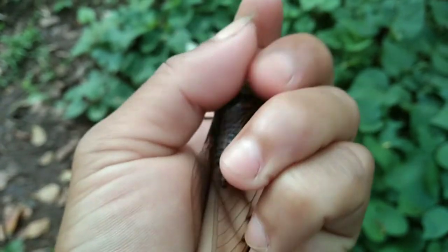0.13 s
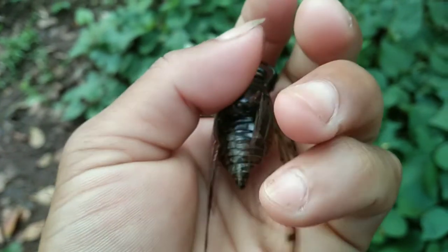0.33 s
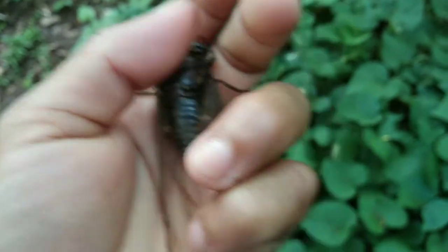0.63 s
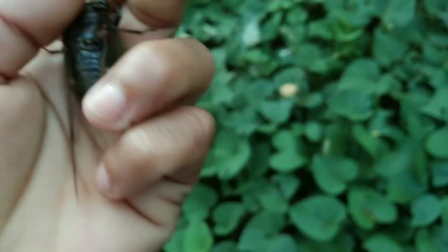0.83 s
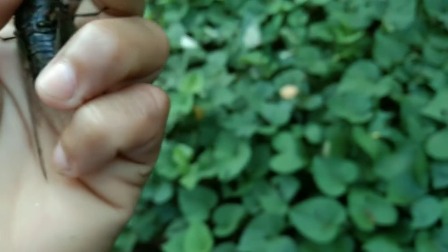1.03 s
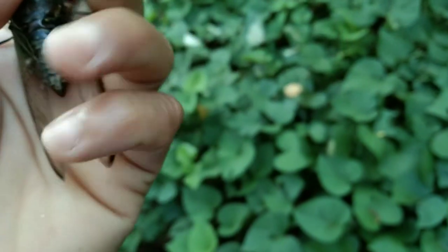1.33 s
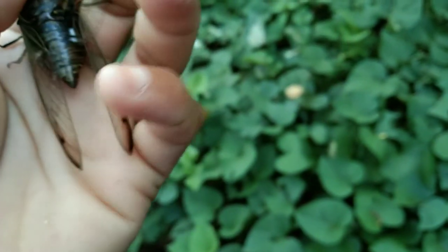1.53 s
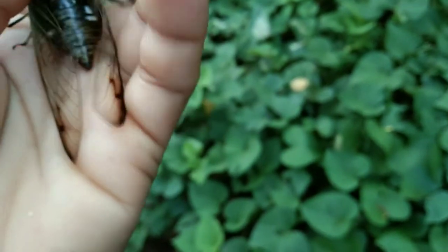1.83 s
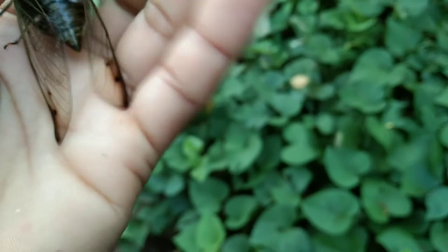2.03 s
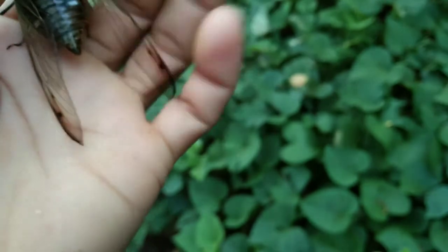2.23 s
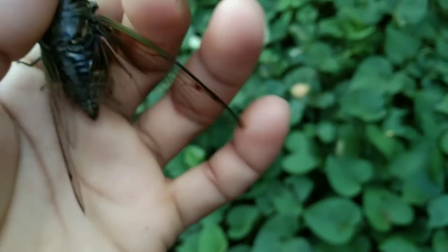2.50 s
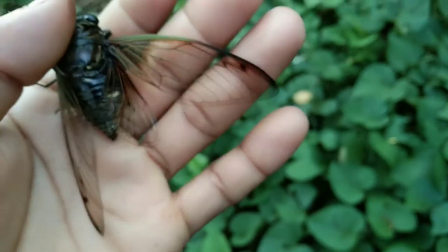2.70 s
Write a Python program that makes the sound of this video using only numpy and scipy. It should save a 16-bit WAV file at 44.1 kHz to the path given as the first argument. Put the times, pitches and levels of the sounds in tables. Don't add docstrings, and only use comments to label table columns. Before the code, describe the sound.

A dense, shrill cicada drone, strongest around 6.5-8 kHz, runs throughout in a wood. Close and dry, a held cicada's wings crack in clusters at 0.1-0.25, 0.52 and 0.65-0.75 seconds with gritty rubbing, sparse single flicks at 1.12 and 1.35, then more from 2.2 to 2.65. Crickets chirp rapidly; faint bird whistles come near 0.3 and 2 seconds, over low hum and soft hand thumps.

```python
import sys
import numpy as np
from scipy import signal
from scipy.io import wavfile
from scipy.ndimage import uniform_filter1d

SR = 44100
rng = np.random.default_rng(int(sys.argv[2]) if len(sys.argv) > 2 else 0)


def digitize_waveform(pressure):
    field = np.atleast_2d(pressure).T
    bounded = np.clip(field, -1, 1)
    quanta = np.round(bounded * 32767).astype(np.int16)
    wavfile.write(sys.argv[1], SR, quanta)


def natural_amplitude(level_db):
    exponent = np.asarray(level_db, float) / 20
    return 10 ** exponent


N = 126126


def level(x, db):
    return x * natural_amplitude(db) / np.sqrt(np.mean(x ** 2))


def noise():
    return rng.standard_normal(N)


def ring(x, hz, width, count=2):
    b, a = signal.iirpeak(min(hz, .45 * SR), hz / width, SR)
    for _ in range(count):
        x = signal.lfilter(b, a, x)
    return x


def curve(rows):
    return np.interp(np.arange(N) / SR, *np.array(rows).T)


def walk(rate):
    hold = int(SR / rate)
    steps = np.repeat(rng.standard_normal(N // hold + 1), hold)
    return 1.186 * uniform_filter1d(uniform_filter1d(steps, hold), hold)[:N]


def gate(s, length, edge):
    t = np.arange(N) / SR - s
    return np.sin(np.pi / 2 * np.clip(np.minimum(t, length - t) / edge, 0, 1)) ** 2


def clicks(rate, scatter, size_db):
    draw = rng.standard_normal((2000, 2))
    gaps = np.exp(scatter * draw[:, 0]) / rate
    at = (np.cumsum(gaps) * SR).astype(int)
    out = np.zeros(N)
    out[at[at < N]] = natural_amplitude(size_db * draw[at < N, 1])
    return np.roll(out, rng.integers(N))


def coloured(shape, lo, hi, patchy_db, rate):
    hz, db = np.array(shape).T
    out = 0
    for f in np.geomspace(lo, hi, num=28):
        band_db = np.interp(np.log(f), np.log(hz), db) + patchy_db * walk(rate)
        out = out + ring(noise(), f, f / 6, count=3) * natural_amplitude(band_db)
    return out


def air_and_rumble():
    # [f/Hz, level/dB per Hz]
    air_shape = [(550, -35), (1500, -25), (2000, -22.5), (2550, -18.5), (3300, -18.5), (4200, -12.5),
                 (5000, -3.5), (5900, -9)]
    # [f/Hz, level/dB per Hz]
    rumble_shape = [(15, -51), (25, -34), (77, -0.5), (123, -7.5), (157, -6.5), (289, -16), (367, -28),
                    (472, -29), (600, -41.5), (780, -67), (1320, -120)]
    air = level(coloured(air_shape, 518.5, 6290, patchy_db=.7, rate=13.07), -48.5)
    rumble = level(coloured(rumble_shape, 28.06, 533.3, patchy_db=4.5, rate=8.7), -60.5)
    return air + rumble


def engine():
    hz = 123.4 * (1 + 0.018 * walk(4.9))
    return natural_amplitude(-62 + 2.5 * walk(12)) * np.sin(2 * np.pi * np.cumsum(hz) / SR)


def hand_thumps():
    # [t/s, level/dB]
    thumps = [
        (.74, -59),
        (1.003, -56),
        (1.26, -63.5),
        (1.798, -61.5),
        (1.97, -58.5),
        (2.418, -87),
        (2.672, -89),
    ]
    knock = level(ring(noise(), 90.3, 70, count=3), 0)
    rise_s = 0.1
    return knock * sum(natural_amplitude(db) * gate(s - rise_s, 2 * rise_s + 0.048, rise_s) for s, db in thumps)


def cicadas():
    # [ring f/Hz, width/Hz, level/dB, rate/Hz (two clicks per cycle, but one at 107),
    # flicker/dB]
    choirs = [
        (6218, 420, -51.5, 260, 0.5),
        (6542, 285, -44, 240, 1.5),
        (6936, 930, -38.5, 175, 1.5),
        (7500, 227, -40.5, 75, 2),
        (7705, 265, -40, 255, 2),
        (7970, 435, -41.5, 97, 0.5),
        (8490, 770, -59, 53, -8.5),
        (9380, 640, -51.5, 190, -0.5),
        (9880, 670, -49, 107, 0.27),
        (10390, 610, -58.5, 200, 0),
    ]
    # [t/s, level/dB]
    swell_points = [(0.0, -35), (0.09, -38), (0.125, -34.5), (0.14, -37), (0.84, -37), (0.98, -35),
                    (1.09, -36.5), (1.17, -35.5), (1.39, -36), (1.43, -35.5), (2.86, -37)]
    steady_rate, top_hz = 107, 10870
    steady = clicks(steady_rate, .03, 0.83)
    out = 0
    for hz, width, db, rate, flicker_db in choirs:
        near = steady if rate == steady_rate else clicks(2 * rate, .25, 4.0)
        near = level(near * np.sign(noise()), 0)
        crowd = level(noise(), 4.5)
        out = out + level(ring(crowd + near, hz, width, count=3), db) * natural_amplitude(flicker_db * walk(13.94))
    swell = curve(swell_points)
    lowpass = signal.cheby1(10, 1, top_hz, fs=SR, output="sos")
    return signal.sosfilt(lowpass, out * natural_amplitude(swell - swell.mean()))


def bird():
    # [t/s, length/s, f/Hz, level/dB]
    whistles = [
        (0.27, 0.25, 2760, -64),
        (.41, .1, 3640, -67),
        (0.93, 0.25, 3545, -71),
        (1.98, 0.37, 3545, -62),
    ]
    out = np.zeros(N)
    for s, length, hz, db in whistles:
        phase = 2 * np.pi * np.cumsum(hz * (1 + .0006 * walk(25))) / SR
        out += natural_amplitude(db + 1.5 * walk(40)) * gate(s, length, length / 4) * np.sin(phase)
    return out


def beating_cricket():
    first_s, every_s, chirp_s = .008, .1415, .045
    beat = sum(gate(first_s + k * every_s, chirp_s, 0.0099) for k in range(21))
    tone = level(ring(clicks(90, 0.034, 0.2), 4970, 300), -51)
    return tone * beat * natural_amplitude(-1.5 * np.arange(N) / SR)


def trilling_cricket():
    # [t/s, length/s, f/Hz, level/dB]
    trills = [
        (0.218, 0.14, 5670, -52),
        (0.535, 0.18, 5560, -50.5),
        (1.3, 0.049, 5340, -43.5),
        (1.514, 0.16, 5660, -51.5),
        (1.77, 0.1, 5600, -48),
        (1.993, 0.059, 5470, -46),
        (2.71, 0.12, 5650, -50.5),
    ]
    out = np.zeros(N)
    for s, length, hz, db in trills:
        teeth = clicks(140, 0.22, 1.6) * np.sign(noise())
        out += level(ring(teeth, hz, 390), db) * gate(s, length, 0.039)
    return out


def bush_cricket():
    # [t/s, f/Hz, level/dB]
    ticks = [
        (.91, 8500, -49),
        (1.19, 8620, -56),
        (1.44, 8450, -51),
        (1.68, 8450, -54),
        (1.92, 8580, -50),
        (2.18, 8620, -49),
    ]
    t, t60_s = np.arange(N) / SR, .45
    out = np.zeros(N)
    for s, hz, db in ticks:
        tail = natural_amplitude(-60 * abs(t - s) / t60_s)
        out += level(ring(noise(), hz, 140), db) * gate(s, 0.25, .004) * tail
    return out


def wood_echo(x):
    t, t60_s = np.arange(SR // 4) / SR, 0.14
    tail = rng.standard_normal(len(t)) * natural_amplitude(-60 * t / t60_s)
    return signal.fftconvolve(x, tail / np.sqrt(np.sum(tail ** 2)))[:N]


def blips():
    # [t/s, f/Hz, level/dB]
    soft_puffs = [(.02, 1234, -72), (1.0, 994, -70), (1.0, 616, -87), (0.119, 1750, -70), (1.36, 1040, -77),
                  (2.35, 1930, -71), (0.143, 1510, -64.5), (.2, 1880, -67), (0.261, 1700, -68),
                  (0.248, 403, -83.5), (0.298, 990, -81), (0.448, 880, -83), (0.749, 304, -68.5),
                  (0.823, 1520, -68.5), (1.008, 454, -68.5), (1.01, 794, -74), (1.06, 1190, -75),
                  (1.193, 1630, -68), (1.35, 684, -81), (1.59, 555, -79.5), (1.728, 437, -84),
                  (1.957, 1620, -69), (1.978, 1070, -75), (2.15, 2000, -76), (2.221, 883, -71),
                  (2.411, 1793, -62.5), (2.429, 292, -69.5), (2.612, 1173, -71), (2.75, 2060, -67.5),
                  (2.26, 2720, -74), (2.322, 2830, -67.5), (.82, 400, -79), (1.83, 417, -81), (2.67, 449, -78)]
    # [t/s, f/Hz, level/dB]
    squeaks = [(.2, 14600, -82), (.27, 13900, -84), (.27, 14700, -85), (.52, 13500, -87),
               (.645, 15500, -84), (.62, 12800, -88), (.86, 12000, -83), (1.38, 15100, -84),
               (1.43, 14000, -88), (1.5, 11800, -79), (1.83, 11500, -78), (2.0, 11900, -79.5),
               (2.19, 12600, -83.5), (2.32, 11900, -79.5), (2.38, 14700, -83), (2.49, 15550, -80),
               (2.55, 14700, -85), (2.63, 14250, -85), (2.63, 15450, -79)]
    puff_s, width_hz = 0.079, 76
    out, n = np.zeros(N + 16384), int(puff_s * SR)
    for s, hz, db in soft_puffs + squeaks:
        puff = ring(rng.standard_normal(8192), hz, width_hz)[-n:] * np.hanning(n)
        i = max(int((s - puff_s / 2) * SR), 0)
        out[i:i + n] += level(puff, db)
    return out[:N]


def wing_scrape():
    # [t/s, level/dB]
    effort_points = [(0, -2), (.12, -8), (.3, -5.5), (.33, -17), (.5, -19), (.58, -6), (.72, -3), (.88, -9),
                     (.92, -6), (1.3, -54), (1.34, -14), (1.46, -13), (1.55, -31), (2.36, -19), (2.39, -13),
                     (2.44, -4.5), (2.58, -5), (2.72, -19.5), (2.86, -28)]
    per_s, top_db = 1000, -66.5
    size_db = 8 * np.minimum(rng.exponential(size=N), 3)
    grains = (rng.random(N) < per_s / SR) * natural_amplitude(size_db) * np.sign(noise())
    grains = grains + 0.51 * noise()
    effort = curve(effort_points)
    body = level(ring(grains, 3270, 2900), -56) * natural_amplitude(0.76 * effort)
    hiss = level(ring(grains, 11900, 1600, count=3), top_db) * natural_amplitude(effort)
    edge = level(ring(grains, 14400, 1500, count=3), top_db - 4) * natural_amplitude(1.5 * effort)
    return body + hiss + edge


def wing_flicks():
    # [t/s, low ring peak/dB, snap peak/dB, top end peak/dB, ring f/Hz]
    flicks = [(.0248, -42, -60, -56, 4200), (.105, -70, -48, -46, 3360), (.113, -60, -40, -50, 3400),
              (0.1191, -35, -40, -50, 3250), (0.1266, -32, -21, -40, 3350), (0.1336, -31, -16, -36, 3200),
              (0.205, -31.5, -47, -65, 3220), (.2095, -40, -60, -70, 3200), (.2319, -36, -50, -68, 3100),
              (0.236, -38, -51, -64, 3250), (.2395, -39, -55, -66, 3200), (0.5202, -35, -50, -62, 2920),
              (.5237, -32, -40, -60, 2950), (.527, -35, -50, -56, 3000), (.6524, -35, -45, -60, 3570),
              (0.6592, -33, -45, -62, 3060), (0.6736, -38, -44, -55, 3100), (.681, -40, -50, -52, 4000),
              (.685, -36, -50, -54, 4600), (0.6885, -46, -40, -47, 4000), (0.7193, -42, -40, -48, 3500),
              (.727, -43, -45, -51, 3400), (.747, -44, -43, -55, 3600), (1.1213, -42, -72, -75, 3620),
              (1.3493, -34, -50, -64, 4000), (2.1874, -36, -50, -62, 3530), (2.3421, -40, -55, -70, 2900),
              (2.3464, -37, -50, -70, 3900), (2.3515, -42, -55, -70, 3000), (2.392, -28, -28, -55, 4800),
              (2.393, -38, -50, -70, 3300), (2.4588, -39, -54, -60, 3900), (2.4723, -44, -45, -53, 3980),
              (2.5805, -37, -45, -48, 3400), (2.6489, -38, -50, -62, 3500), (2.6515, -38, -21, -62, 3700)]
    # [t/s, peak/dB]
    veins = [(.2528, -66), (.5087, -68), (.582, -56), (.638, -49), (.651, -61), (.819, -61), (.863, -60),
             (1.3164, -68), (1.338, -54), (1.372, -45), (1.424, -47), (1.445, -53), (1.457, -59),
             (1.83, -62), (2.017, -65), (2.494, -60), (2.505, -51), (2.542, -49), (2.56, -56), (2.568, -54),
             (2.6025, -54), (2.625, -49), (2.638, -49)]
    vein_flicks = [(s, db - 28, db - 23, db, 3000) for s, db in veins]
    n, crack_s = 2048, .001
    out, t = np.zeros(N + n), np.arange(n) / SR
    for s, ring_db, snap_db, top_db, hz in flicks + vein_flicks:
        crack = np.r_[3, rng.standard_normal(n - 1) * np.exp(-t[1:] / crack_s)]
        membrane = ring(crack, hz, 1200) + .6 * ring(crack, 5980, 2200)
        snap = ring(crack, 7500, 2500, count=3)
        top = ring(crack, 11900, 2160, count=3)
        very_top = ring(crack, 14600, 2000, count=3)
        i = int(s * SR)
        for part, db in [(membrane, ring_db), (snap, snap_db), (top, top_db), (very_top, top_db - 13)]:
            out[i:i + n] += natural_amplitude(db) * part / abs(part).max()
    return out[:N]


def wings():
    highpass = signal.butter(6, 1900, "high", fs=SR, output="sos")
    return signal.sosfilt(highpass, wing_flicks() + wing_scrape())


def scene():
    background = air_and_rumble() + engine() + hand_thumps()
    crickets = beating_cricket() + trilling_cricket() + bush_cricket()
    wood = cicadas() + bird() + crickets + natural_amplitude(0.5) * wood_echo(crickets)
    return (background + wood + blips() + wings())[None]


def suppress(x):
    # [t/s, f/Hz]
    shut_edge = [
        (0, 2520),
        (.48, 2380),
        (.6, 1945),
        (1.13, 1930),
        (1.25, 2210),
        (2.1, 2420),
        (2.25, 2750),
        (2.45, 2340),
        (2.72, 2360),
    ]
    # [t/s, length/s, centre f/Hz, width/Hz, level/dB]
    dips = [
        (.35, .16, 3250, 500, -17),
        (1.17, .16, 3400, 800, -11),
        (1.5, .3, 3500, 900, -5),
        (1.85, .15, 3400, 700, -4),
    ]
    expand, lets_go_hz, shut_db = 1.9, 4800, -12
    mute_hz, mute_db = 10880, -91
    hz, t, z = signal.stft(x, SR, nperseg=1024)

    patch = uniform_filter1d(uniform_filter1d(abs(z) ** 2, size=3, axis=0), size=6, axis=1) + 1e-20
    usual = uniform_filter1d(np.median(patch, axis=1), size=5)[:, None]
    reach = expand * np.clip((lets_go_hz - hz) / 1200, 0, 1) * np.clip(hz / 2400, .8, 1.4)
    gain = np.clip(patch / usual, .3, 1.6) ** (reach[:, None] / 2)

    under = np.clip((np.interp(t, *np.array(shut_edge).T) - hz[:, None]) / 60, 0, 1)
    gain *= natural_amplitude(shut_db * under * np.clip(hz / 1500, 0, 1)[:, None])
    for s, length, dip_hz, width, db in dips:
        shut = np.clip((t - s) / 0.13, 0, 1) * (t < s + length)
        band = np.clip(2 - abs(hz - dip_hz) / width * 4 + .5, 0, 1)
        gain *= natural_amplitude(db * band[:, None] * shut)

    top = hz > mute_hz
    blocks = uniform_filter1d(abs(z[top]) ** 2, size=12, axis=0)[6::12]
    blocks = np.repeat(blocks, 12, axis=0)
    openness = 8 * np.log10(blocks[:top.sum()] / natural_amplitude(2 * mute_db) + 1e-9)
    gain[np.flatnonzero(top)[:len(blocks)]] = np.clip(openness, 0, 1)
    return signal.istft(z * gain, SR, nperseg=1024)[1][:N]


def band_limit(x):
    return signal.sosfilt(signal.butter(12, 15700, fs=SR, output="sos"), x)


def record(dry):
    mix = suppress(dry[0])[None]
    return band_limit(mix)


dry = scene()
out = record(dry)
digitize_waveform(out)
```